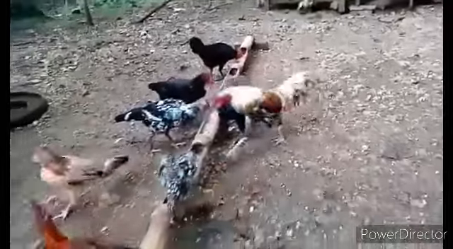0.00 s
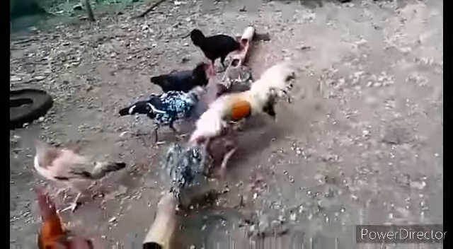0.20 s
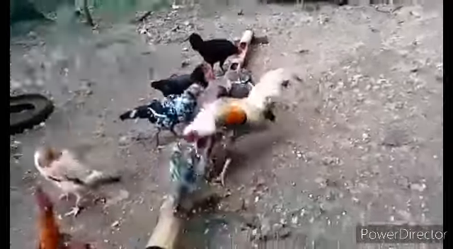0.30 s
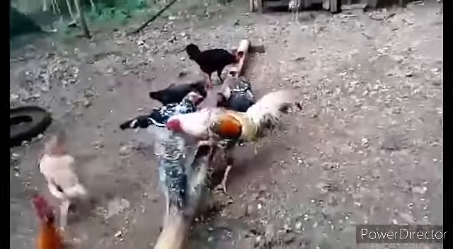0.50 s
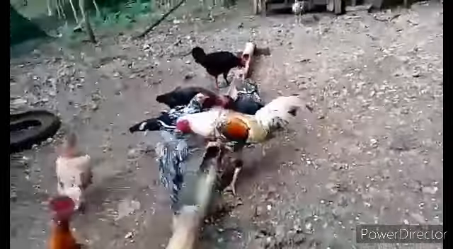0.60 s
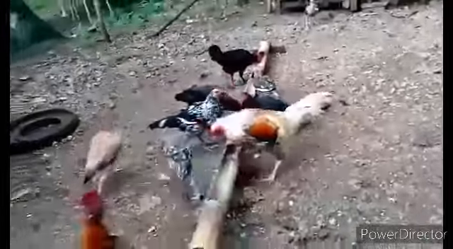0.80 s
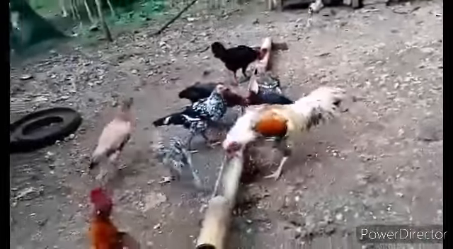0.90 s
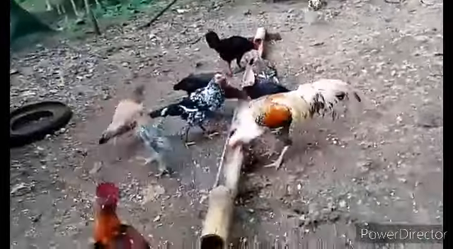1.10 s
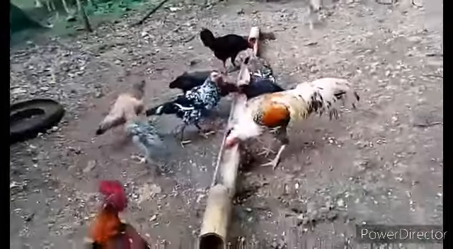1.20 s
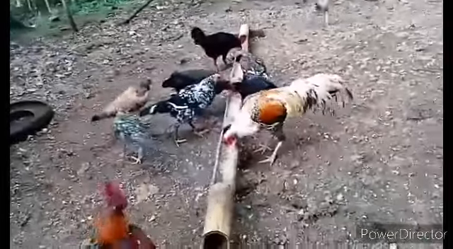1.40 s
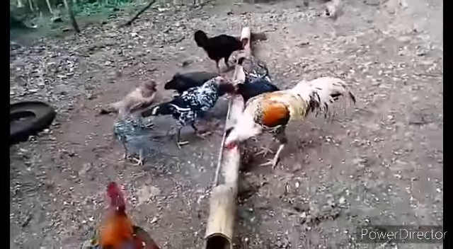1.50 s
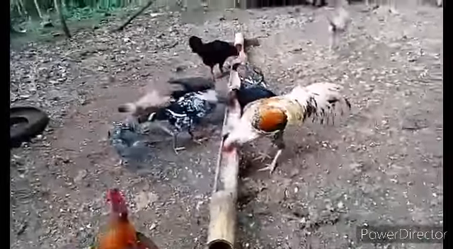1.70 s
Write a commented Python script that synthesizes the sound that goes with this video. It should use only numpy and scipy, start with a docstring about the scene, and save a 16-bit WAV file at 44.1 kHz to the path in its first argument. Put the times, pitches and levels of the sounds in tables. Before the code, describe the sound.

Feeding chickens knock their beaks on a bamboo trough outdoors, sharply at first. Two brief raspy squawks follow, then quieter taps while feet scratch and scuff the earth. A faint hum lies underneath, and everything is louder on the right.

```python
"""Chickens crowd a bamboo feed trough in an open yard. From the start, feet scratch in the grit
over a faint low hum and beaks knock on the bamboo, which rings briefly. One bird gives a soft peep.
At 0.3 s and 0.6 s one squawks, short and hoarse: rough pulses ringing its throat. From 0.5 s feet
thump and scuff on the earth, and the pecking goes on, softer, to the end.
The right channel is louder and slightly late."""
import sys
import numpy as np
from scipy import signal
from scipy.fft import rfft, irfft, next_fast_len
from scipy.io import wavfile
from scipy.ndimage import uniform_filter1d

SR = 44100
rng = np.random.default_rng(int(sys.argv[2]) if len(sys.argv) > 2 else 0)


def inscribe(sig):
    """Save sig as 16-bit PCM at rate SR to the path in sys.argv[1].

    A 1-D sig is mono; a 2-D sig holds one channel per row.
    Samples are clipped to [-1, 1] before scaling.
    """
    pcm = np.round(np.clip(np.atleast_2d(sig).T, -1, 1) * 32767)
    wavfile.write(sys.argv[1], SR, pcm.astype(np.int16))


N = 79380
T = np.arange(N) / SR


def amp(db):
    """Decibels to gain."""
    return 10 ** (np.asarray(db) / 20)


def unit(x):
    """Scales to rms 1."""
    return x / np.sqrt(np.mean(x ** 2) + 1e-20)


def decay(t, t60_s):
    """Falls 60 dB in t60_s."""
    return np.exp(-np.log(1000) * t / t60_s)


def read(points, hz):
    """Reads a table on a log-frequency axis."""
    f, value = np.transpose(points)
    return np.interp(np.log(hz + 1), np.log(f + 1), value)


def add(mix, start_s, sound):
    """Mixes a sound in at start_s."""
    part = mix[max(round(start_s * SR), 0):][:len(sound)]
    part += sound[:len(part)]


def shape(x, gain):
    """Filters by a gain that is a function of frequency."""
    size = next_fast_len(2 * x.shape[-1])
    return irfft(rfft(x, size) * gain(np.fft.rfftfreq(size, 1 / SR)), size)[..., :x.shape[-1]]


def colour(x, points):
    """Filters by a (frequency [Hz], gain [dB]) table."""
    return shape(x, lambda hz: amp(read(points, hz)))


def low_cut(x, hz):
    """A small body radiates little bass."""
    return signal.sosfilt(signal.butter(3, hz, "high", fs=SR, output="sos"), x)


def wobble(rate_hz):
    """Random motion up to about rate_hz."""
    return unit(shape(rng.standard_normal(N), lambda hz: np.exp(-(hz / rate_hz) ** 2)))


def resonate(x, hz, width_hz):
    """A resonance of gain 1 that follows a frequency curve."""
    turn = np.exp(2j * np.pi * np.cumsum(hz) / SR)
    pole = np.exp(-np.pi * width_hz / SR)
    return 2 * (turn * signal.lfilter([1 - pole], [1, -pole], x / turn)).real


def ring(modes, t, t60_ratio, pitch_ratio, spot_spread=.025):
    """Dying modes, a little different at each struck spot."""
    hz, db, t60_s = np.transpose(modes)[:, :, None]
    hz = hz * pitch_ratio * (1 + spot_spread * rng.standard_normal(hz.shape))
    envelopes = amp(db) * decay(t, t60_s * t60_ratio)
    return (envelopes * np.sin(2 * np.pi * (hz * t + rng.random(hz.shape)))).sum(0)


# left-right likeness (frequency [Hz], coherence [0-1])
COHERENCE = [(60, 0.34), (150, 0.96), (400, 0.85), (1200, 0.27), (3000, 0.2), (9000, 0.13)]
def spread(a, b):
    """Two unrelated signals become a partly alike pair."""
    alike = lambda hz: np.clip(read(COHERENCE, hz), 0, 1)
    left = shape(a, alike) + shape(b, lambda hz: np.sqrt(1 - alike(hz) ** 2))
    return np.array([left, a])


def diffuse(spectrum, db):
    """Noise from all around, at a steady or changing level."""
    return amp(db) * unit(colour(spread(*rng.standard_normal((2, N))), spectrum))


def level_db(points):
    """A level curve, sample by sample."""
    return np.interp(T, *np.transpose(points))


# hum, rumble and air spectra (frequency [Hz], gain [dB])
HUM_SPECTRUM = [(20, -65), (40, -78), (62, -19), (85, -12), (122, 4.5), (175, 8), (230, -9), (400, -18.5),
                (900, -47.5)]
RUMBLE_SPECTRUM = [(20, -41), (40, -16), (65, -1), (100, 6.5), (200, -3), (600, -55)]
AIR_SPECTRUM = [(200, -16.5), (500, -13.5), (900, -11.5), (1600, 6.5), (2600, 11), (4500, -1.5), (5600, 9),
                (7000, -9.5), (8500, 2.5), (10000, -11.5), (11300, 4), (12200, -15)]
# hum and rumble envelopes (time [s], level [dB])
HUM_ENVELOPE = [(0, -62.5), (0.088, -54), (.135, -92), (.25, -68), (0.349, -63.5), (.6, -67), (0.782, -66),
                (1.0, -68), (1.13, -62.5), (1.32, -65.5), (1.451, -63), (1.66, -66.5), (1.8, -65)]
RUMBLE_ENVELOPE = [(0, -79), (.3, -58), (.45, -77), (1.05, -77), (1.13, -63.5), (1.27, -69), (1.35, -92),
                   (1.7, -75), (1.8, -59.5)]
def background():
    """A faint hum and a deeper rumble waver under a steady hiss of air."""
    hum = diffuse(HUM_SPECTRUM, level_db(HUM_ENVELOPE))
    rumble = diffuse(RUMBLE_SPECTRUM, level_db(RUMBLE_ENVELOPE))
    return hum + rumble + diffuse(AIR_SPECTRUM, db=-65)


# scratching envelope (time [s], level [dB])
SCRATCH_ENVELOPE = [(0, -54), (.06, -65.5), (.15, -70), (.172, -52), (.23, -56), (.3, -54), (.46, -54),
                    (.56, -58), (.7, -59.5), (.79, -66.5), (.84, -63), (.93, -68.5), (.99, -60.5),
                    (1.09, -65.5), (1.12, -55.5), (1.18, -69.5), (1.25, -57.5), (1.33, -66.5), (1.4, -58.5),
                    (1.52, -80.5), (1.59, -71), (1.68, -56.5), (1.8, -59.5)]
# grit spectrum (frequency [Hz], gain [dB])
GRIT_SPECTRUM = [(100, -5.5), (300, -4), (480, -5), (900, 0.5), (1300, -1.5), (1900, -4.5), (2600, 0),
                 (3800, -5), (5500, -18), (7000, -19.5), (12000, -41)]
def scratching(grains_per_s=700, spread_db=2.5, grain_t60_s=.012, wash=1):
    """Many tiny ticks of grain and grit under feet and beaks, in a wash of noise."""
    sizes = amp(spread_db * np.minimum(rng.exponential(1, N), 4))
    ticks = sizes * (rng.random(N) < grains_per_s / SR)
    power = signal.lfilter([1], [1, -decay(1 / SR, grain_t60_s) ** 2], ticks ** 2)
    grains = (unit(np.sqrt(power)) + wash) * rng.standard_normal((2, N))
    return unit(colour(spread(*grains), GRIT_SPECTRUM)) * amp(level_db(SCRATCH_ENVELOPE))


# beak strikes (time [s], gain [dB], pitch [ratio], brightest frequency [Hz], t60 [ratio])
BEAK_STRIKES = [(.0082, -21, 0.97, 3640, 0.78), (0.1665, -43, 1.05, 3120, 0.78),
                (.2116, -18.5, 1, 2700, .68), (.2548, -35, 0.8, 780, 0.77), (.2845, -68, 1.6, 1290, 0.45),
                (.4995, -40, 1.06, 1600, 0.67), (.5315, -40, 0.92, 4560, 1.1),
                (0.5719, -28.5, 1.02, 6300, 0.85), (0.8063, -42, 1, 800, 1.06),
                (1.0680, -42.5, 1.105, 1250, 0.7), (1.109, -45.5, 0.73, 1300, 0.68),
                (1.1275, -38, 0.99, 1870, 1.18), (1.13, -37.5, 1.093, 1180, 1.3),
                (1.2435, -42, 0.9, 1500, 1.47), (1.3025, -52.5, 0.96, 1600, 0.59),
                (1.3435, -55, 0.8, 1500, 0.75), (1.3785, -39.5, .98, 1570, 1.26),
                (1.4475, -49, 0.87, 950, 1.37), (1.6105, -53, 1.07, 1100, 1.1),
                (1.6835, -41.5, 0.821, 1100, 1.5), (1.6915, -37, 0.97, 1210, 1.23),
                (1.7195, -34, 0.93, 1570, 0.32)]
# bamboo modes (base frequency [Hz], gain [dB], base t60 [s])
BAMBOO_MODES = [(790, -11, .022), (950, -2, .027), (1090, -9, .02), (1460, -4, .019), (1780, -11, .014),
                (2040, -1, .018), (2400, -11, .014), (2950, -10, .016), (3680, -10, .016),
                (4360, -12, .015), (5400, -12, .015)]
# beak click spectrum (frequency [Hz], gain [dB])
CLICK_SPECTRUM = [(400, -9), (900, 19.5), (1500, 22), (2500, -10.5), (4000, 5.5), (6000, 6.5),
                  (7500, -18.5), (9000, -7), (12000, -33)]
def peck(db, pitch_ratio, bright_hz, t60_ratio):
    """A beak's dry click and the short ring of the bamboo; a harder contact is brighter."""
    click_db, base_t60_s, rise_s, octave_loss_db = -4, .019, .0006, 2.8
    t = np.arange(SR // 12) / SR
    click = unit(colour(rng.standard_normal(len(t)), CLICK_SPECTRUM)) * decay(t, base_t60_s * t60_ratio)
    bamboo = ring(BAMBOO_MODES, t, t60_ratio, pitch_ratio)
    knock = np.minimum(t / rise_s, 1) * (bamboo + amp(click_db) * click)
    knock = shape(knock, lambda hz: amp(-octave_loss_db * np.log2((hz + 1) / bright_hz) ** 2))
    return amp(db) * low_cut(knock, hz=740)


# peep contour (time [s], pitch [Hz], level [dB])
PEEP_CONTOUR = [(.076, 1700, -72), (.086, 1610, -56), (.097, 1520, -67), (.135, 1600, -68),
                (.16, 1520, -76)]
def peep():
    """A faint, nearly pure note. Returns (start [s], sound)."""
    times_s, pitch_hz, db = np.transpose(PEEP_CONTOUR)
    t = np.arange(times_s[0], times_s[-1], 1 / SR)
    cycles = np.cumsum(np.interp(t, times_s, pitch_hz)) / SR
    return times_s[0], amp(np.interp(t, times_s, db)) * np.sqrt(2) * np.sin(2 * np.pi * cycles)


# throat resonances, beak wide open (frequency [Hz], nominal width [Hz], gain [dB])
THROAT_FORMANTS = [(683, 52, -12), (815, 121, -10), (1300, 133, 3), (1905, 176, 5), (2227, 180, 1),
                   (3018, 138, 0), (3410, 200, -11.5), (4310, 83, -22.5), (5130, 130, -24),
                   (6430, 170, -60), (8060, 600, -55)]
def throat(drive, pitch_hz, effort_db):
    """Resonances rise as the beak opens with the pitch; effort adds treble."""
    open_hz, loud_db, tilt_per_octave, cut_hz = 620, -27.5, .93, 567
    opening = (pitch_hz / open_hz) ** .3
    voice = 0
    for hz, width_hz, gain_db in THROAT_FORMANTS:
        tilt_db = tilt_per_octave * (effort_db - loud_db) * np.log2(hz / open_hz)
        first_pass = resonate(drive, hz * opening, 2 * width_hz)
        voice += amp(gain_db + tilt_db) * resonate(first_pass, hz * opening, 2 * width_hz)
    return low_cut(low_cut(voice, cut_hz), cut_hz)


# one contour per squawk (time [s], pitch [Hz], level [dB], roughness [0-1])
SQUAWK_CONTOURS = [
    [(.305, 419.5, -52, 0.15), (.316, 515, -36.5, 0.24), (.326, 610.4, -34.5, 0.46),
     (.334, 577.7, -32.5, 0.23), (.343, 608.6, -31.5, 0.22), (.357, 627.1, -26, 0.29),
     (.370, 626.6, -23, 0.33), (.381, 613.4, -26.5, 0.33), (.389, 646.9, -24.5, 0.6),
     (.401, 601.3, -30, 0.31), (.420, 590, -34, 0.54), (.440, 501, -49.5, 0.1), (.450, 470, -62, 0)],
    [(.581, 387.7, -63, 0.47), (.592, 495.2, -39.5, 0.28), (.606, 593.5, -34, 0.34),
     (.619, 603.2, -32, 0.49), (.628, 610.7, -33, 0.25), (.637, 605, -43, 0.42), (.645, 626.6, -36.5, 0.37),
     (.662, 566, -43, 0.79), (.673, 500, -55, 0.8)],
]
def squawk(contour, jitter=.088, shimmer=.68, wobble_hz=282, subharmonic=.4, rasp=1.62):
    """High pulses, uneven and raspy where the voice breaks, ring the throat. Returns (start [s], sound)."""
    times_s, *columns = np.transpose(contour)
    t = np.arange(times_s[0], times_s[-1], 1 / SR)
    size = len(t)
    pitch_hz, db, rough = (np.interp(t, times_s, column) for column in columns)
    cycles = np.cumsum(pitch_hz * (1 + jitter * rough * wobble(wobble_hz)[:size])) / SR
    pulses = unit(sum(np.cos(2 * np.pi * k * cycles) for k in range(1, 20)))
    pulses *= 1 + rough * (shimmer * wobble(wobble_hz)[:size] + subharmonic * np.cos(np.pi * cycles))
    puffs = unit((2 + np.cos(2 * np.pi * cycles)) * rng.standard_normal(N)[:size])
    voice = throat((1 - rough) * pulses + rasp * rough * puffs, pitch_hz, db)
    running_rms = np.sqrt(abs(uniform_filter1d(voice ** 2, size=400)) + 1e-12)
    return times_s[0], voice / running_rms * amp(db)


# footfalls (time [s], gain [dB])
FOOTFALLS = [(0.4979, -44.5), (0.8238, -43.5), (0.984, -57), (1.1113, -41), (1.136, -45.5), (1.266, -50),
             (1.713, -61)]
# packed earth modes (base frequency [Hz], gain [dB], base t60 [s])
EARTH_MODES = [(157, -7, 0.021), (287, -0.5, 0.046), (351, -9, 0.093), (450, -6.5, 0.05),
               (612, -9.5, 0.052)]
def step(db, rise_s=.0018):
    """A dull thump of a foot on earth."""
    t = np.arange(SR // 10) / SR
    thump = np.minimum(t / rise_s, 1) * ring(EARTH_MODES, t, t60_ratio=.98, pitch_ratio=.935)
    return amp(db) * low_cut(thump, hz=136)


# scuffing envelope (time [s], level [dB])
SCUFF_ENVELOPE = [(0, -76), (.78, -84), (0.828, -60), (.92, -64.5), (1.0, -63.5), (1.07, -66.5),
                  (1.14, -80), (1.18, -87), (1.23, -55.5), (1.31, -74.5), (1.55, -83), (1.8, -60.5)]
# soil spectrum (frequency [Hz], gain [dB])
SOIL_SPECTRUM = [(100, -28), (280, 4), (420, -4), (570, 3.5), (750, 3), (1000, -5), (2000, -53.5)]
def scuffing():
    """Dull noise of feet rubbing on earth."""
    return diffuse(SOIL_SPECTRUM, level_db(SCUFF_ENVELOPE))


# yard reverberation (frequency [Hz], t60 [s])
YARD_DECAY = [(200, 0.71), (1000, 0.15), (3000, 0.72), (8000, 0.71)]
def yard(x, early_db=-5.5, early_t60_s=.029, tail_db=-15.5):
    """Quick reflections from ground and trough, then a weak outdoor tail."""
    t = T[:SR // 2]
    hz, frames_s, bands = signal.stft(rng.standard_normal((2, len(t))), SR, nperseg=256)
    bands *= decay(frames_s, read(YARD_DECAY, hz)[:, None])
    tail = signal.istft(bands, SR, nperseg=256)[1][:, :len(t)]
    early = rng.standard_normal(tail.shape) * (t > .002) * decay(t, early_t60_s)
    echo = sum(amp(db) * part / np.linalg.norm(part, axis=1, keepdims=True)
               for db, part in [(early_db, early), (tail_db, tail)])
    return x + signal.fftconvolve(x[None], echo, axes=1)[:, :N]


def scene():
    """The flock in the yard, over hum and air."""
    birds = np.zeros(N)
    for start_s, *strike in BEAK_STRIKES:
        add(birds, start_s, peck(*strike))
    add(birds, *peep())
    for contour in SQUAWK_CONTOURS:
        add(birds, *squawk(contour))
    for start_s, db in FOOTFALLS:
        add(birds, start_s, step(db))
    return background() + scratching() + yard(birds) + scuffing()


# left microphone relative to right (frequency [Hz], gain [dB])
LEFT_RESPONSE = [(60, -6), (180, -5.5), (350, -8), (620, -6), (1150, -6), (2000, -11), (3600, -12),
                 (6450, -4), (11600, 0.5)]
def record(dry, right_lag_s=.00098, edge_hz=12200):
    """The left microphone is weaker, the right one later; then the band limit."""
    left = colour(dry[0], LEFT_RESPONSE)
    right = shape(dry[1], lambda hz: np.exp(-2j * np.pi * hz * right_lag_s))
    low_pass = signal.firwin(511, edge_hz, window=("kaiser", 9), fs=SR)
    return signal.oaconvolve(np.array([left, right]), low_pass[None], "same")


dry = scene()
out = record(dry)
inscribe(out)
```